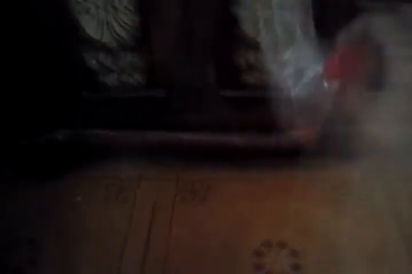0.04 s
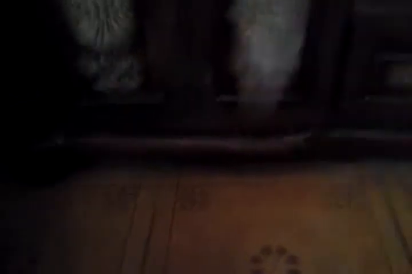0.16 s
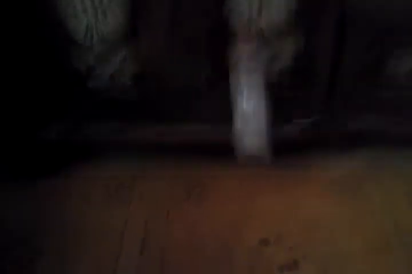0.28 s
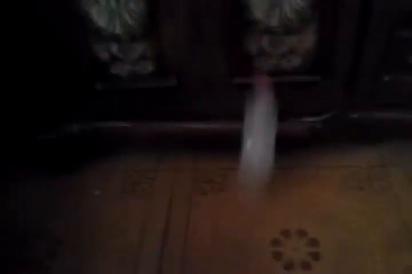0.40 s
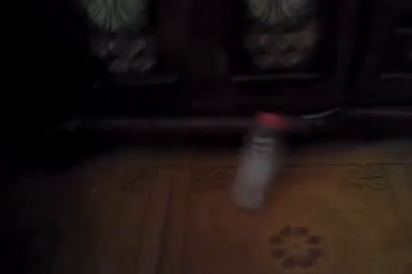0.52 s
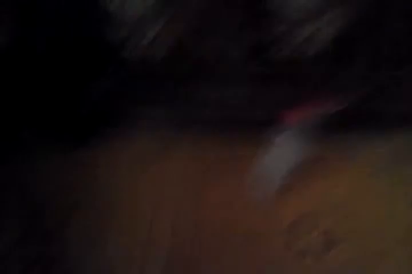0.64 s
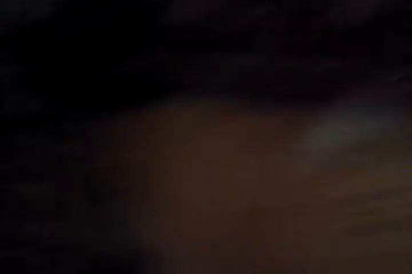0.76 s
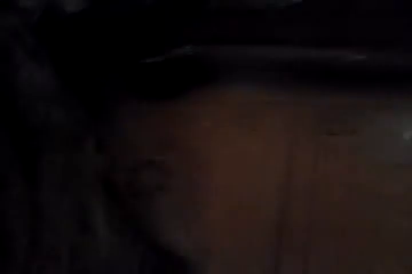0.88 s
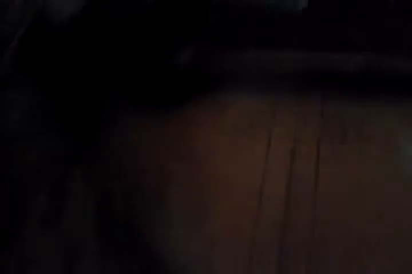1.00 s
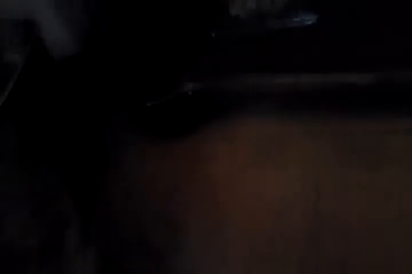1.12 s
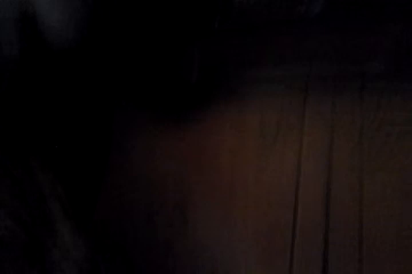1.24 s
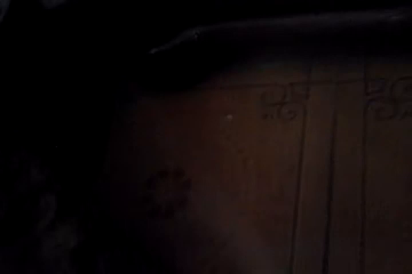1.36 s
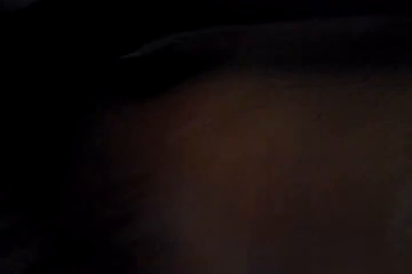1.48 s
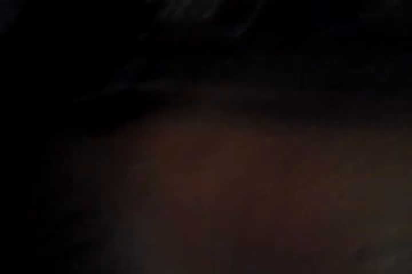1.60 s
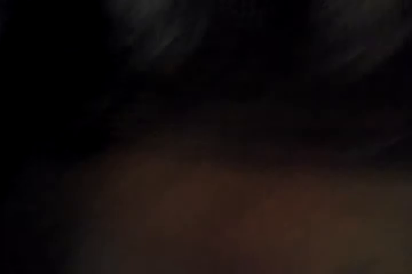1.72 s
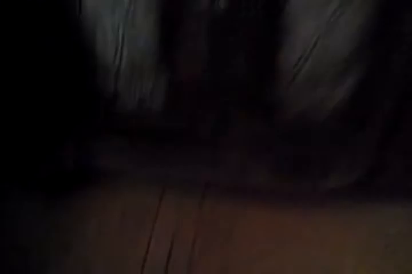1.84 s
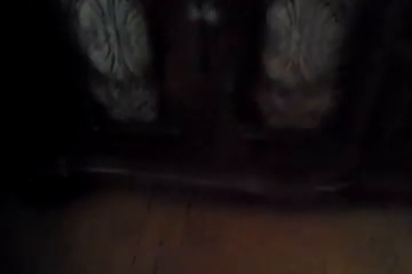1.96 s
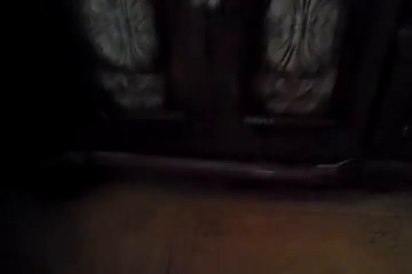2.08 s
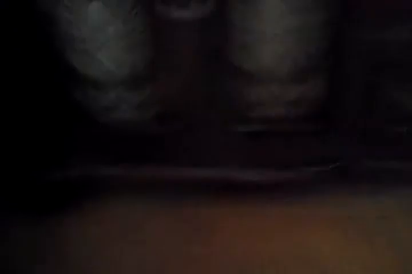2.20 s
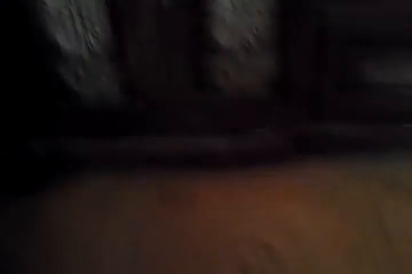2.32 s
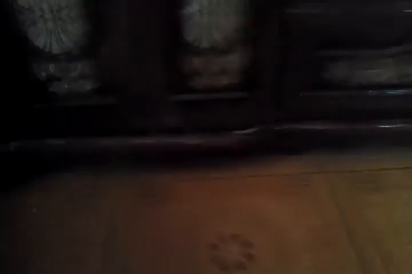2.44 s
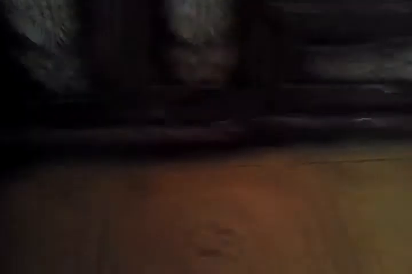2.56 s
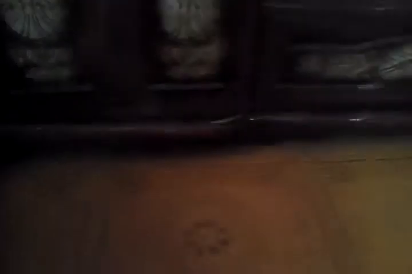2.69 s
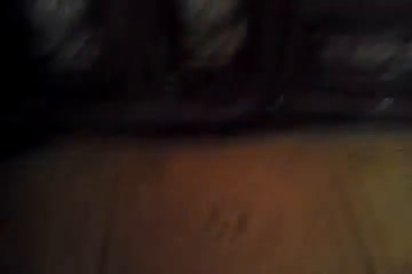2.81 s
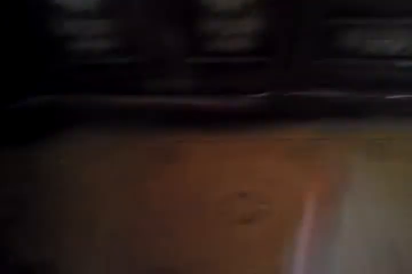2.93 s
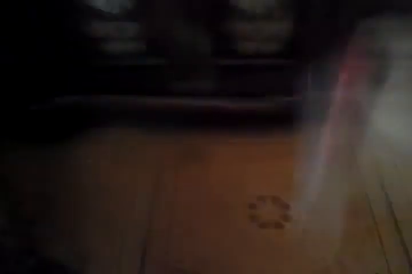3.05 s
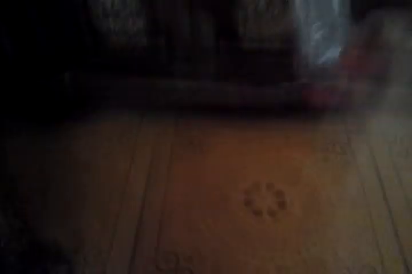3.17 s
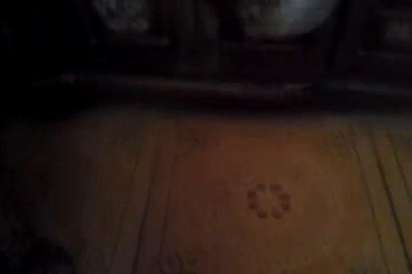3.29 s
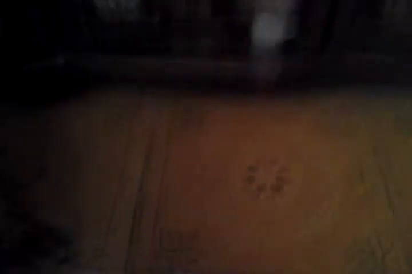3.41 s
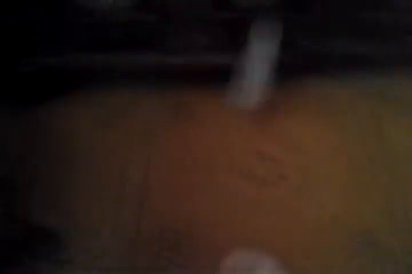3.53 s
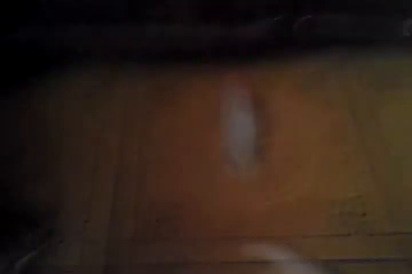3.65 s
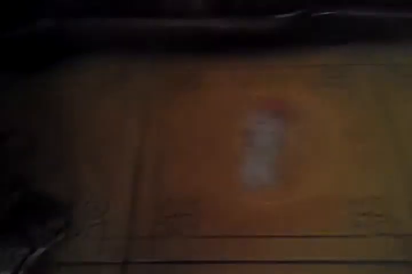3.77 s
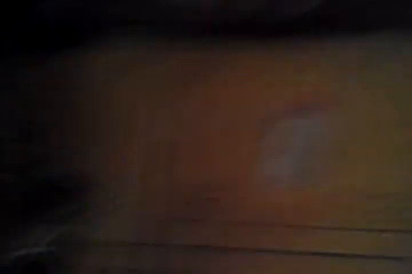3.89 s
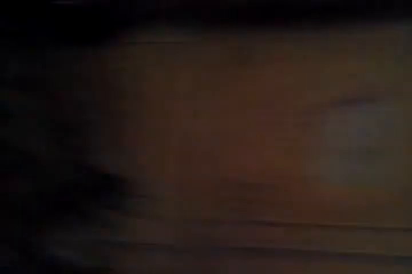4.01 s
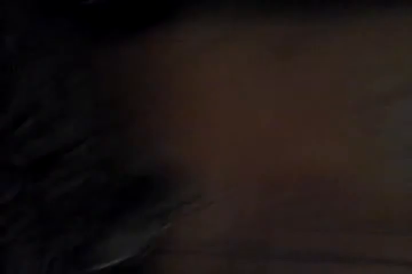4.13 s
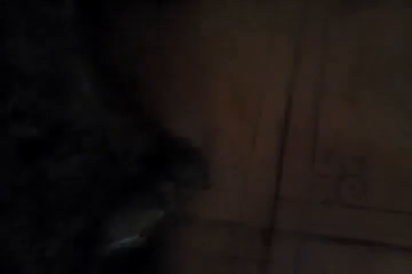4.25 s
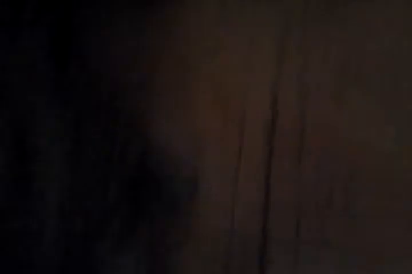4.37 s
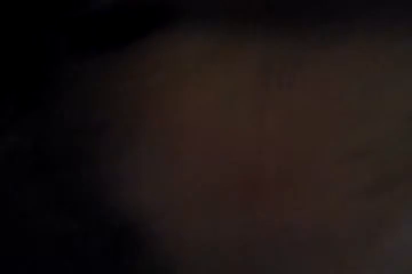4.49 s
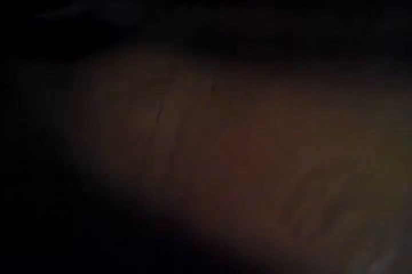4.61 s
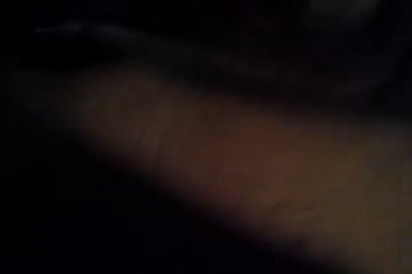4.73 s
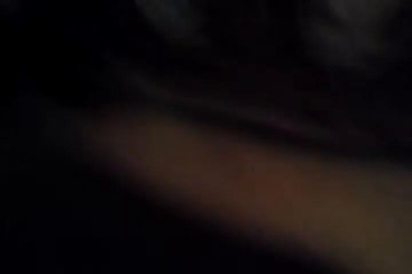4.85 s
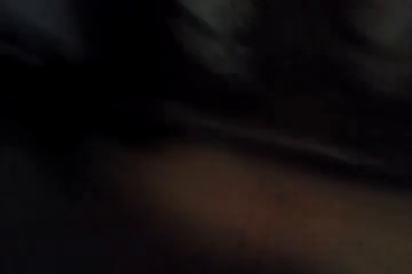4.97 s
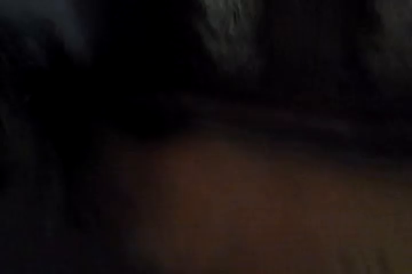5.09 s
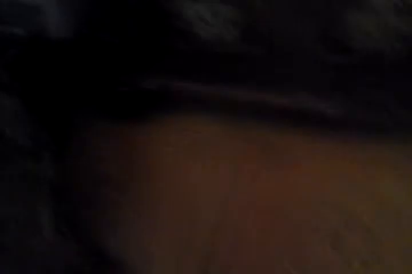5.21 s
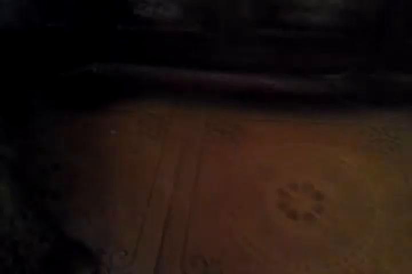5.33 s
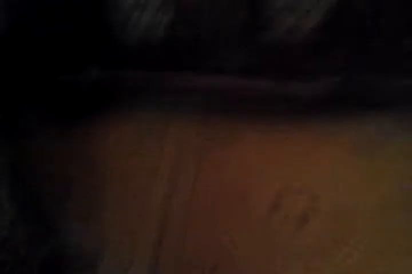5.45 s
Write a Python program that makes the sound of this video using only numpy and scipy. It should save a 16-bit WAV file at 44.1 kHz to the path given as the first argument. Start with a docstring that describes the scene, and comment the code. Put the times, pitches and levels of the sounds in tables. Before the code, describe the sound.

In a small room, a hand bumps and rubs the microphone, then a part-filled plastic bottle lands on a rug with a loud, crackling thud and bounces in several hollow clatters. After a pause with only faint hiss, a sleeve swishes and the bottle lands again, knocking about three times. A sharp tick on the microphone and soft clothing rustle follow.

```python
"""In a small room, a part-filled plastic bottle is flipped twice onto a rug; it bounces and topples.
Each blow buckles the shell in a burst of snaps that ring the bottle and the room.
The hand-held camera is bumped and rubbed, the grip squeaks, and clothing rustles over a steady hiss.
Its two microphones are wired in opposite polarity and overload on the hardest landings."""
import sys
import numpy as np
from scipy import signal
from scipy.fft import rfft, irfft
from scipy.io import wavfile
from scipy.ndimage import uniform_filter1d

SR = 44100
rng = np.random.default_rng(int(sys.argv[2]) if len(sys.argv) > 2 else 0)


def store_wav(level_fs):
    """Save 16-bit WAV to argv[1]."""
    pcm = np.round(np.clip(np.atleast_2d(level_fs), -1, 1) * 32767)
    wavfile.write(sys.argv[1], SR, pcm.T.astype(np.int16))


N = 245195
TIME = np.arange(N) / SR


def amp(db):
    """Decibels to gain."""
    return 10 ** (np.asarray(db) / 20)


def unit(x):
    """Scales to rms 1."""
    return x / np.sqrt(np.mean(x ** 2) + 1e-20)


def read(points, hz):
    """Reads a table on a log-frequency axis."""
    points_hz, values = np.transpose(points)
    return np.interp(np.log(hz + 1), np.log(points_hz + 1), values)


def bins(x):
    """Frequencies of the spectrum of x."""
    return np.fft.rfftfreq(x.shape[-1], 1 / SR)


def add(mix, start_s, sound):
    """Mixes a stereo sound in."""
    part = mix[:, max(round(start_s * SR), 0):][:, :sound.shape[-1]]
    part += sound[:, :part.shape[-1]]


def colour(x, db):
    """Minimum-phase filter with gain db at each bin of x."""
    log_gain = np.log(amp(db))
    mirrored = np.concatenate([log_gain, log_gain[-2:0:-1]])
    response = np.exp(np.conj(signal.hilbert(mirrored)))[:len(db)]
    return irfft(rfft(x) * response, x.shape[-1])


def peak(hz, centre_hz, width_hz):
    """Bell shape of a resonance, 1 at its centre."""
    return 1 / (1 + (2 * (hz - centre_hz) / width_hz) ** 2)


def sides(balance_db):
    """Left and right gains, the louder at 1; positive is left."""
    return amp(np.minimum([[balance_db], [-balance_db]], 0))


def diffuse(pair, likeness=0.98, gap_m=0.125):
    """Sound from all sides: long waves reach both microphones alike, short ones do not."""
    left, other = rfft(pair)
    coherence = likeness * np.sinc(2 * bins(pair) * gap_m / 343)
    right = coherence * left + np.sqrt(1 - coherence ** 2) * other
    return irfft([left, right], pair.shape[-1])


def noise(spectrum, spiky_db=0.):
    """Coloured stereo noise at rms 1; spiky_db makes it grainy."""
    white = rng.standard_normal((2, N)) * amp(spiky_db * np.minimum(rng.exponential(1, N), 5))
    return unit(irfft(rfft(white) * amp(read(spectrum, bins(white))), N))


def stroke(start_s, hold_s, attack_s, ease_db_per_s, release_db_per_s):
    """Envelope of a sliding contact: quick grip, easing hold, release."""
    t = np.maximum(TIME - start_s, 0)
    fall_db = ease_db_per_s * t + release_db_per_s * np.maximum(t - hold_s, 0)
    return np.minimum(t / attack_s, 1) * amp(-fall_db)


def hiss():
    """Steady room air and microphone hiss."""
    # Each row: frequency in Hz, relative density in dB.
    spectrum = [(25, -18), (60, -16), (110, -11.5), (200, -5.5), (400, -9.5), (700, -8.5), (1200, -7.5),
                (1600, -11.5), (2400, -17.5), (3600, -19.5), (5200, -19.5), (7000, -17.5), (8500, -23),
                (11000, -25.5), (14500, -31)]
    return amp(-49.5) * diffuse(noise(spectrum), likeness=0.72)


def rustle(drop_db=12.5):
    """Grainy friction: the sleeve swells and fades with arm speed; fingers scrape briefly."""
    # Each row: frequency in Hz, relative level in dB.
    spectrum = [(200, -0.5), (600, 4.5), (1400, -0.5), (2500, -1.5), (4200, -1.5), (6000, 2), (8000, -1.5),
                (11000, -9.5), (14500, -17)]
    # Each row: fastest moment in seconds, level in dB, build-up and settling in seconds per drop_db.
    sleeve_sweeps = [(0.125, -40, .14, .11), (0.72, -53.5, .1, 0.23), (1.375, -48.5, 0.15, 0.12),
                     (1.52, -54.5, 0.067, 0.34), (3.235, -43.5, 0.049, .06), (4.35, -46, 0.03, 0.046),
                     (4.428, -48, 0.026, 0.063), (4.65, -53, 0.15, 0.21), (5.03, -53.5, .15, .25)]
    # Each row: centre in seconds, level in dB, half length in seconds.
    finger_scrapes = [(0.058, -35.5, 0.0059), (0.085, -43, 0.0069), (0.134, -34.5, 0.0064),
                      (0.632, -38.5, 0.0019), (1.288, -55, 0.0016), (1.383, -51, 0.0035),
                      (1.533, -42.5, 0.0033), (1.603, -45, 0.0029), (3.167, -47, 0.0066),
                      (4.036, -45, 0.0036), (4.426, -49, 0.0075), (4.639, -48.5, 0.007)]
    envelope = np.zeros(N)
    for at_s, db, build_s, settle_s in sleeve_sweeps:
        away = np.maximum((at_s - TIME) / build_s, (TIME - at_s) / settle_s)
        envelope += amp(db - drop_db * away)
    for at_s, db, half_s in finger_scrapes:
        envelope += amp(db) * np.exp(-((TIME - at_s) / half_s) ** 2)
    return noise(spectrum, spiky_db=3.5) * envelope


def palm_rub():
    """The palm slides on the camera case: a low rumble, louder on the left."""
    # Each row: frequency in Hz, relative level in dB.
    spectrum = [(15, -59), (25, -14), (60, -9), (107, -2), (173, -6), (261, -8.5), (350, -14), (595, -26),
                (1500, -31.5), (3300, -78.5)]
    # Each row: start in seconds, length in seconds, level in dB.
    slides = [(0.0, 0.22, -29), (0.34, 0.069, -34.5), (0.504, 0.079, -36.5), (1.498, .02, -50.5),
              (1.563, .14, -53), (1.785, 0.035, -57), (1.97, .02, -58)]
    envelope = sum(amp(db) * stroke(at_s, hold_s, attack_s=0.014, ease_db_per_s=18, release_db_per_s=268.5)
                   for at_s, hold_s, db in slides)
    return noise(spectrum) * envelope * amp([[2.], [-3.]])


def grip_squeak(start_hz=3820, climb_hz=55, waver_hz=22, hold_s=0.055):
    """A thin, wavering tone that climbs as the grip tightens."""
    waver = unit(uniform_filter1d(rng.standard_normal(N), size=300))
    hz = start_hz + climb_hz * np.minimum(TIME / hold_s, 1) + waver_hz * waver
    phase = 2 * np.pi * np.cumsum(hz) / SR
    envelope = stroke(0, hold_s, attack_s=0.003, ease_db_per_s=50, release_db_per_s=149)
    return amp(-41.5) * envelope * np.array([np.sin(phase), np.cos(phase)])  # ports in quadrature


def case_bumps():
    """Each soft finger bump pushes the camera case in and out once."""
    # Each row: centre in seconds, peak in dB, half width in seconds, left minus right in dB.
    bumps = [(0.0340, -7, 0.00076, 16), (0.0435, -3.5, 0.0008, 29), (0.0587, -10.5, 0.001, 12),
             (0.0727, -16.5, 0.00069, 20), (0.1250, -19.5, 0.0011, 21), (0.1371, -13, 0.0013, 12),
             (0.1434, -13.5, 0.0014, 20), (1.586, -40, 0.0044, 13), (1.696, -38.5, 0.0016, 16)]
    out = np.zeros((2, N))
    for at_s, db, half_s, balance_db in bumps:
        u = (TIME - at_s) / half_s
        out += sides(balance_db) * amp(db) * u * np.exp((1 - u ** 2) / 2)
    return out


def case_ticks():
    """Hard ticks ring the camera case for about a millisecond."""
    # Each row: time in seconds, peak in dB, ring in Hz, width in Hz, left minus right in dB.
    ticks = [(4.1771, -8, 5900, 830, -15), (4.1792, 6.5, 6480, 1330, -31), (4.1793, -9, 11100, 4900, -2.5),
             (4.1792, -10, 5100, 1900, -19), (4.1807, -13.5, 1420, 1800, 16),
             (4.5079, -19.5, 2400, 2700, 24.5), (4, -29, 7020, 3000, 13)]
    out = np.zeros((2, N))
    click = signal.unit_impulse(2048)
    for at_s, db, ring_hz, width_hz, balance_db in ticks:
        ring = colour(click, 20 * np.log10(peak(bins(click), ring_hz, width_hz)))
        add(out, at_s, sides(balance_db) * amp(db) * ring / abs(ring).max())
    return out


def room(t, tail_db, floor_t60_s=0.031, furniture_t60_s=0.09, rise_s=0.0099):
    """Impulse response: a slap off the floor, a quick cluster off the furniture, then the tail."""
    # Each row: frequency in Hz, reverberation T60 in seconds.
    decay = [(100, 0.33), (300, 0.38), (1000, 0.34), (3000, 0.38), (6000, 0.45), (13000, 0.35)]
    floor, furniture, tail = rng.standard_normal((3, 2, len(t)))
    floor *= amp(-60 * t / floor_t60_s)
    furniture *= amp(-60 * t / furniture_t60_s)
    hz, frame_s, frames = signal.stft(tail, SR, nperseg=256)
    frames *= amp(-60 * frame_s / read(decay, hz)[:, None])
    tail = signal.istft(frames, SR, nperseg=256)[1][:, :len(t)]
    tail *= 1 - np.exp(-t / rise_s)
    echoes = amp(2.5) * unit(floor) + amp(-3) * unit(furniture) + amp(tail_db) * unit(tail)
    end_fade = np.clip(4 * (1 - t / t[-1]), 0, 1) ** 2
    return diffuse(echoes) * end_fade


def blow(level_db, thud_db, crack_db, crumple_s, base_hz, base_db, wall_hz, wall_db, tail_db, size=24576):
    """The shell buckles in a burst of snaps; where it lands decides which panels resound."""
    # Spectrum of a blow on the shell. Each row: frequency in Hz, gain in dB.
    shell = [(40, -27), (80, -17), (118, -0.5), (200, 0), (300, 3.5), (550, 0), (780, -2.5), (1050, -5),
             (1400, -8.5), (2200, -11.5), (3800, -14.5), (5900, -14.5), (8000, -18), (14500, -29.5)]
    # Bottle resonances. Each row: centre in Hz, width in Hz, gain in dB.
    modes = [(406, 21, -0.5), (767, 36, 4.5), (940, 110, 1), (1050, 20, 1), (1290, 44, 1.5), (1372, 48, 4),
             (1530, 35, 5), (1730, 34, -1), (2073, 20, 3), (2800, 37, -0.5), (3150, 130, 5),
             (3700, 100, -1.5)]
    t = np.arange(size) / SR
    snaps = rng.standard_normal(size) * (rng.random(size) < 0.15) * np.exp(-t / crumple_s)
    give_s = 0.00054 + 0.296 * crumple_s  # the rug yields first, longer under a soft landing
    snaps *= 1 - np.exp(-t / give_s)
    burst = signal.fftconvolve(snaps[None], room(t, tail_db), axes=1)[:, :size]
    power = (abs(rfft(burst)) ** 2).mean(0)
    whiten_db = -10 * np.log10(abs(uniform_filter1d(power, size=70)) + 1e-9)
    hz = bins(burst)
    tone_db = read(shell, hz) + thud_db / (1 + (hz / 185) ** 4) + crack_db / (1 + (2600 / (hz + 1)) ** 3)
    tone_db += base_db * peak(hz, base_hz, 0.32 * base_hz)
    tone_db += wall_db * peak(hz, wall_hz, 0.23 * wall_hz)
    tone_db += sum(db * peak(hz, mode_hz, width_hz) for mode_hz, width_hz, db in modes)
    return amp(level_db) * colour(burst, tone_db + whiten_db)


def bottle():
    """Landings, bounces and soft nudges on the rug."""
    # Each row: start in seconds, level in dB, floor thud in dB, crack in dB, crumple time in seconds,
    # base resonance in Hz, its gain in dB, wall resonance in Hz, its gain in dB, room tail in dB.
    blows = [ (0.236, 28, -6, -8, .0007, 286, 6, 895, 11, -0.5),
             (0.2768, 21, -7, 6, .0032, 400, -3, 3420, 12, -16),
             (0.2795, 38, -8, -7, .0023, 426, 0, 1000, 16.5, -11.5),
             (0.2891, 27.5, 6, -17, .0055, 404, 10, 1030, 7.5, -3.5),
             (0.3339, 18, 18, 5.5, 0.003, 355, 12, 790, 8, -4.5),
             (0.4752, 24, -9, 1.5, .003, 280, 14.5, 705, 5.5, -6.5),
             (0.9666, 25.5, -12, 1.5, 0.0019, 275, 3.5, 1600, 6.5, -4),
             (0.979, 29, -23, -11, 0.0049, 490, 7.5, 1690, 10, -6),
             (1.0457, 24.5, -28, -11, .0024, 318, 19, 1500, -3.5, 0.5),
             (1.535, -0.5, -16, -7, .015, 293, 22, 600, 11, -12),
             (3.2298, 5.5, -15, 12, .0022, 380, -8, 1100, 12, -5),
             (3.434, 23.5, 9, 8.5, 0.0066, 264, 11, 890, 6, -2.5),
             (3.442, 24.5, 11, -1, .02, 310, 5.5, 1160, 8, -0.5),
             (3.543, 15, -8, 8.5, 0.0027, 500, -10, 2330, 14.5, -4.5),
             (3.5457, 28.5, 3, 1, .0013, 616, 11.5, 1740, 11, -7),
             (3.6536, 28, -13.5, -1.5, 0.0054, 435, 8.5, 1050, 9.5, -1.5),
             (4.346, 5.5, -14, -15, 0.018, 350, 10.5, 714, 5, -7), ]
    out = np.zeros((2, N))
    for start_s, *settings in blows:
        add(out, start_s, blow(*settings))
    return out


def scene():
    """Bottle, hiss and friction enter the two ports; bumps and ticks come through the case."""
    # Right microphone against the left. Each row: frequency in Hz, gain in dB.
    right_tone = [(60, -6), (500, -2), (800, -2.5), (1050, -5.5), (1600, -2.5), (2200, -1.5), (4400, -1),
                  (7500, -2.5), (10000, -7), (14500, -3)]
    left, right = bottle() + hiss() + palm_rub() + rustle() + grip_squeak()
    hz = bins(right)
    port_db = 9.6 * peak(hz, centre_hz=5820, width_hz=1660)  # right port resonance
    right = irfft(rfft(right) * amp(read(right_tone, hz) + port_db), N)
    return np.array([left, right]) + case_bumps() + case_ticks()


def record(dry):
    """The right microphone is inverted; both clip, then pass a band limit."""
    clipped = np.clip(dry * [[1], [-1]], -0.95, 0.95)
    edge_hz = 14800
    lowpass = signal.firwin(255, edge_hz, window=("kaiser", 7), fs=SR)
    return signal.oaconvolve(clipped, lowpass[None], "same")


dry = scene()
out = record(dry)
store_wav(out)
```